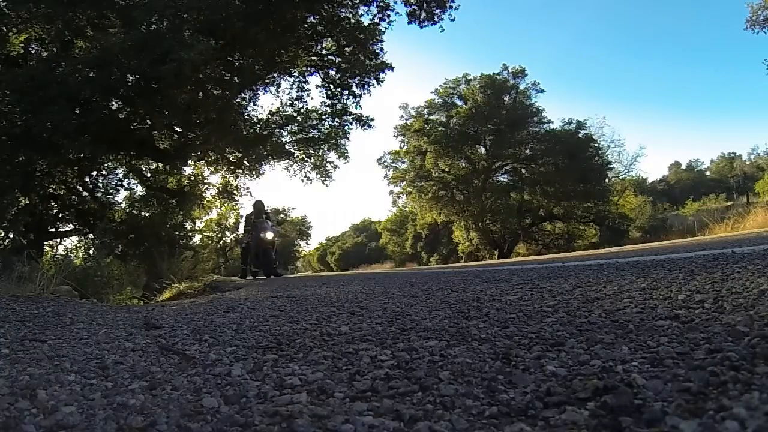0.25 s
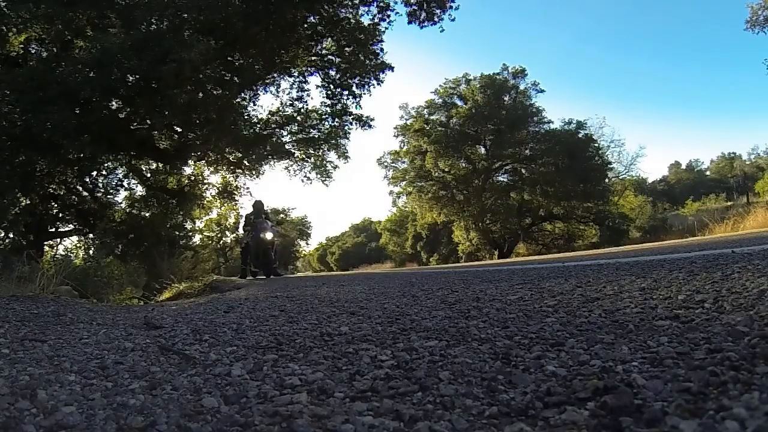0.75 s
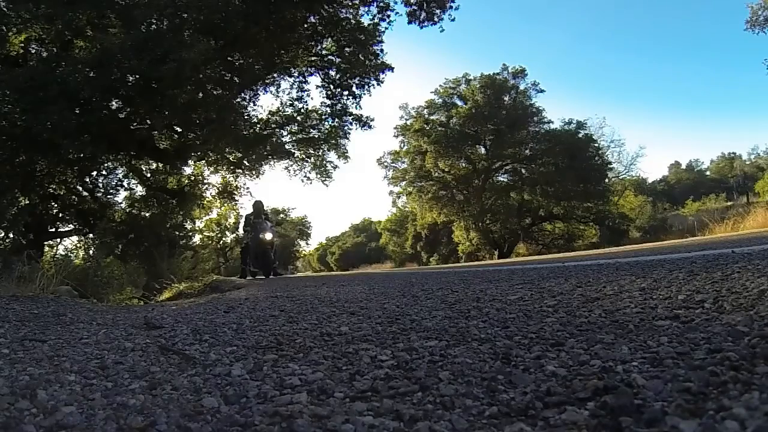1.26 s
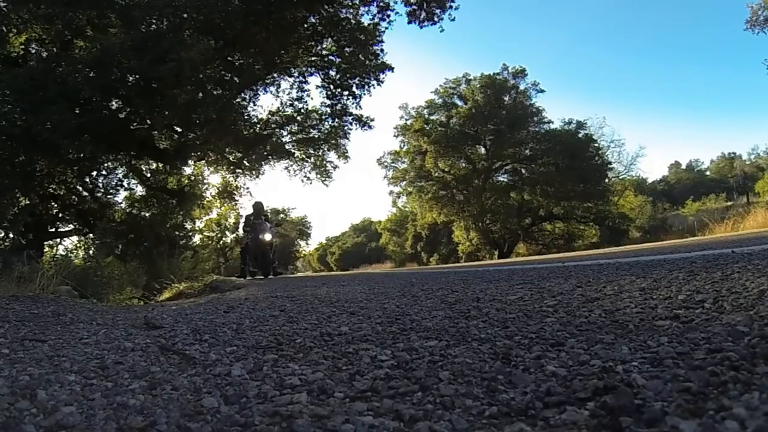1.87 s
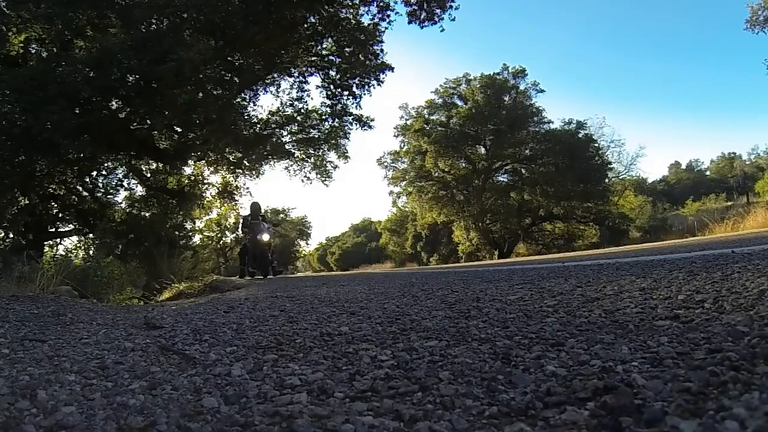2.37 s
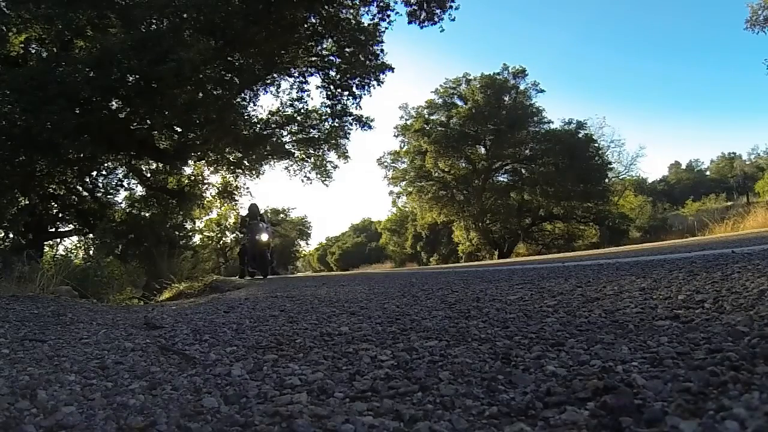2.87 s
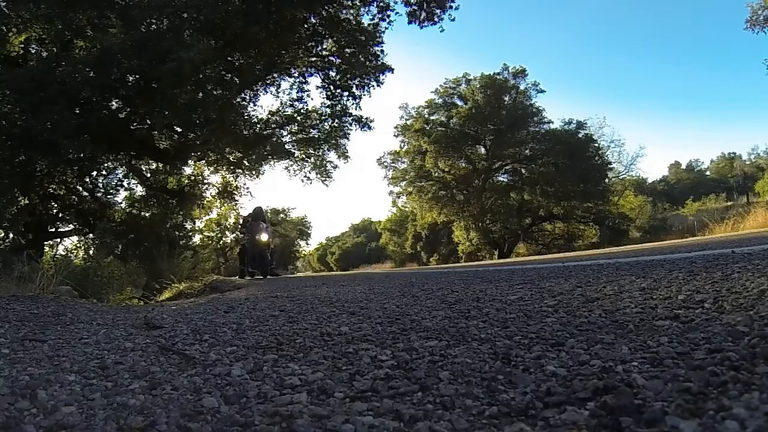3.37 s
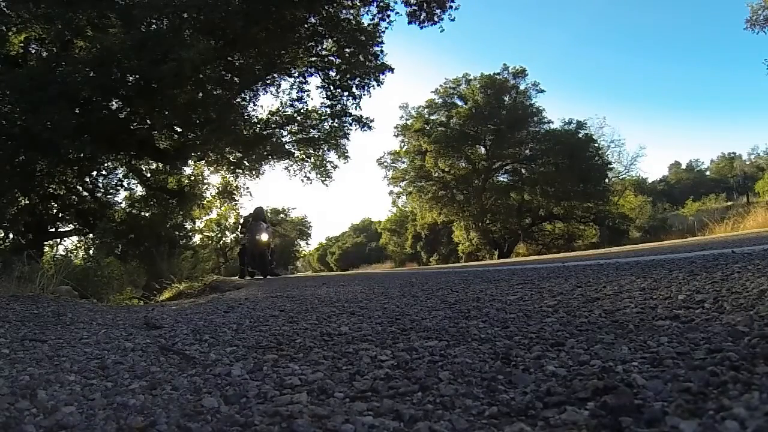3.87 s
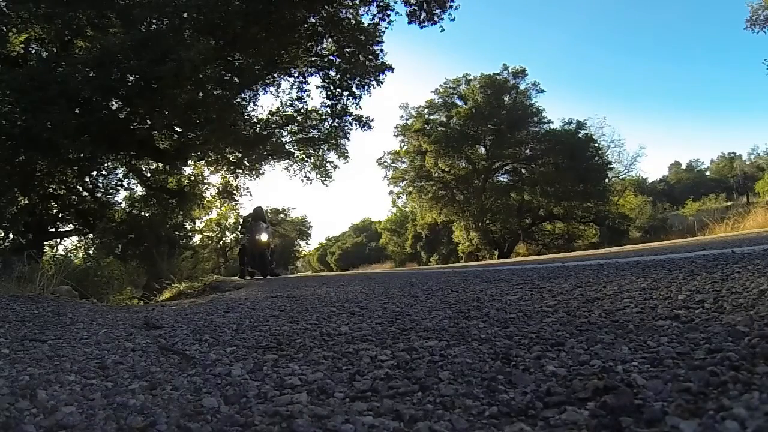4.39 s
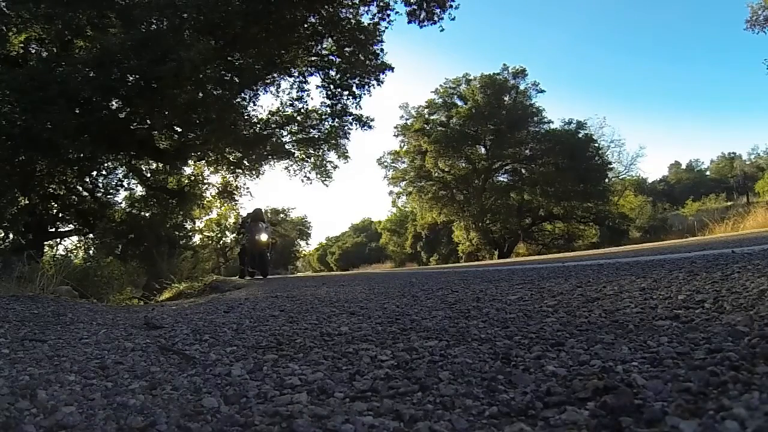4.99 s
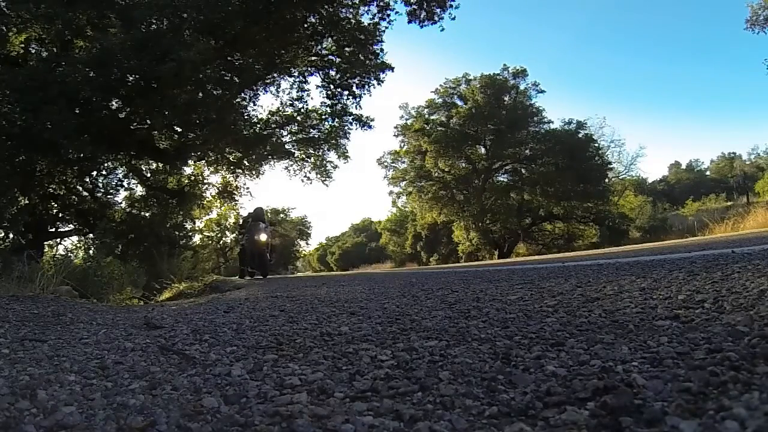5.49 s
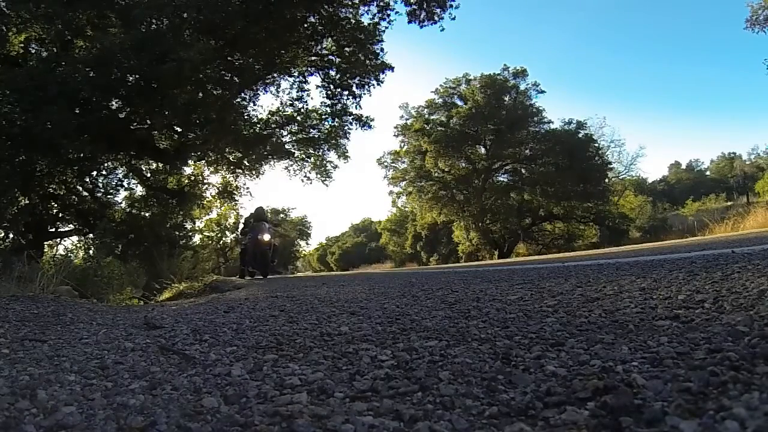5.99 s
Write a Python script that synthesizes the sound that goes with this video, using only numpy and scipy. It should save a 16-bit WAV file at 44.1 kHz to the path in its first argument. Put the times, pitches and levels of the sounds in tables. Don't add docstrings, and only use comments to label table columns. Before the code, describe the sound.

Raspy twin-cylinder motorcycle rev drops, two quick throttle blips, uneven crackling descent to slow chugging, engine cut, then key and stand clicks in quiet outdoor air.

```python
import sys
import numpy as np
from scipy import signal
from scipy.fft import rfft, irfft
from scipy.io import wavfile
from scipy.ndimage import uniform_filter1d

SR = 44100
rng = np.random.default_rng(int(sys.argv[2]) if len(sys.argv) > 2 else 0)


def persist_wave(psi):
    counts = np.round(np.clip(psi, -1, 1) * 32767).astype(np.int16)
    wavfile.write(sys.argv[1], SR, np.atleast_2d(counts).T)


def linear_from_db(decibels):
    return 10 ** (np.asarray(decibels, float) / 20)


N = 275624
T = np.arange(N) / SR
HZ = np.fft.rfftfreq(2 * N, 1 / SR)[1:]

# time_s, cycles_per_s
SPEED = [(0.0, 51.7), (0.14, 59.35), (0.29, 68.48), (0.43, 68.83), (0.8, 57.0), (1.1, 47.71), (1.24, 44.64),
         (1.49, 42.0), (1.78, 43.93), (2.2, 35.34), (2.6, 29.61), (2.9, 25.3), (3.2, 21.92), (3.5, 19.27),
         (3.9, 17.3), (4.3, 16.91), (4.6, 16.01)]
# open_s, shut_s, stroke_peak_on_opening_db, stroke_peak_on_shutting_db
THROTTLE = [
    (-.1, 0.332, -7, -2.5),
    (1.345, 1.448, -19.5, -11.5),
    (1.616, 1.71, -9, -6.5),
]
OPEN_S, SHUT_S = 0.012, 0.06
# time_s, crack_db, treble_db
CATCHES = [(1.84, -24, -13.5), (1.937, -17.5, -4.5), (2.115, -17, -27), (2.288, -26.5, 0.5),
           (2.312, -12.5, -13), (2.378, -17, -13), (2.433, -11, -40), (2.473, -21, -24),
           (2.532, -11.5, -32), (2.572, -34, -12), (2.632, -10, -22), (2.705, -11.5, -19.5),
           (2.747, -28, -8), (2.777, -10, -24), (2.822, -25, -12), (2.851, -18, -22), (2.901, -24, -17),
           (2.973, -22, -12), (3.025, -17, -17), (3.057, -22.5, -21.5), (3.099, -12, -24),
           (3.191, -29, -20), (3.282, -21.5, -19), (3.34, -24, -18.5), (3.376, -19, -24)]
# mode_hz,
# width_hz, level_db
CAN_LOW = [(303, 28.7, 1.5), (461, 56, 3), (657, 75, -9.5), (749, 44, -15.5)]
STOP_S = 5.07


def engine():
    # rise_ms, smoothness, tailpipe_hz, tailpipe_q, pipe_echo_ms, pipe_echo_gain, echo_top_hz,
    # can_echo_ms, can_echo_gain
    kinds = [
        (0.26, 4.63, 50, 12, 13, 0.5, 700, 2.5, 0.2),
        (1.88, 3.19, 233, 1.17, 11.72, 0.32, 790, 2.98, 0.15),
        (1.38, 4.66, 179, 1.1, 13.31, 0.4, 267, 7.44, 0.11),
        (2.86, 4.53, 204, 0.71, 11.13, 0.61, 167, 1.81, -1.21),
        (5.5, 3.68, 145, 1.2, 10.76, 0.95, 120, 6.5, 0.16),
    ]
    s, period, sizes, lumpy, chance, lean = strokes()
    voices = [exhaust(*kind) for kind in kinds]
    pipe = sum(through(train(s, size), voice) for size, voice in zip(sizes, voices))
    pipe += can_ring(s, period, sizes, lumpy, chance) + heave(s, lumpy, chance)
    unfired = late_burns(s, period, lumpy, chance, lean) + run_down()
    pipe += through(unfired, voices[4] + 0.077 * silencer(CAN_LOW))
    return pipe + gas_rasp(s, sizes[0]) + valve_gear(s, period)


def strokes():
    # time_s, share_of_cycle
    twin_gap = [(0, .252), (.27, .216), (.33, .21), (1, .231), (1.4, .245), (1.75, .245), (3.4, .236)]
    second_db = [0.35, 0.21, 0.3, 1.3]
    start = crank()
    cycle = np.diff(start)
    gap = np.interp(start[:-1], *np.transpose(twin_gap)) * cycle
    s = np.r_[start[:-1], start[:-1] + gap]
    period = np.tile(cycle, 2)
    levels, lumpy = mixture(s, 1 / period)
    chance = rng.standard_normal((len(s), 5)).T
    catch_s = np.transpose(CATCHES)[0]
    to_catch_s = np.abs(start[:-1, None] - catch_s).min(axis=1)
    caught = np.tile(to_catch_s, 2) < 0.22 * period
    lean = (s > catch_s[0]) & (s < 3.46)
    s = s + 0.07 * lumpy ** 2 * period * chance[4] * ~caught
    sizes = []
    for level, luck, db in zip(levels, chance, second_db):
        size = level * linear_from_db(3.63 * lumpy * luck * (1.5 - 0.5 * caught))
        sizes.append(size * linear_from_db(np.repeat([0, db], len(gap))))
    sizes[3] = sizes[3] * linear_from_db(lean * np.where(caught, 2.5, -4.0))
    return s, period, sizes, lumpy, chance, lean


def crank():
    turn_at_start, cycles = 0.57, 168
    t = np.arange(-SR, N) / SR
    turns = np.cumsum(np.interp(t, *np.transpose(SPEED))) / SR
    return np.interp(np.arange(cycles), turns - turns[SR - 1] + turn_at_start, t)


def mixture(s, hz):
    # from_s, to_s, peak_db
    afterburn = [
        (1.203, 1.24, -11),
        (1.476, 1.621, -10),
    ]
    # time_s, loss_db
    misfires = [
        (3.15, -6.5),
        (3.24, -4),
        (3.33, -8.5),
        (3.43, -11),
    ]
    hot_db, cool_db, idle_db, blip_hot_db = -11, -7.5, -4.5, -11.5
    lean_cool_db, lean_hot_db, lean_burn_db = -4, -21.5, -37.5
    steady, open_lumpy, lean_lumpy = 0.07, 0.13, 0.65
    gates = [gate(s, a, b, OPEN_S, SHUT_S) ** 2 for a, b, *_ in THROTTLE]
    wide = 0
    for g, (a, b, db, end_db) in zip(gates, THROTTLE):
        wide = wide + g * linear_from_db(np.interp(s, [a, b], [db, end_db]))
    burns = [gate(s, a, b, 0.0065, 0.015) for a, b, _ in afterburn]
    shut = 1 - sum(gates)
    lean = gate(s, 1.5, 3.1, 0.33, 0.36)
    gulp = sum(gate(s, a - 0.015, a, 0.031, OPEN_S) for a, *_ in THROTTLE)
    miss_db = sum(db * (np.abs(s - 0.1 / hz - at) < 0.3 / hz) for at, db in misfires)
    hot = above(hz, 55.86, 0.49)
    idle = 1 - above(hz, 27.96, 5.1)
    hot_shut = linear_from_db(hot_db + 1.8 * (1 - hot)) * np.sqrt(hot) + linear_from_db(lean_hot_db) * lean + linear_from_db(-21.5) * burns[1]
    hot_peak = shut * hot_shut + (1 - shut) * (1 - hot) * linear_from_db(blip_hot_db)
    cool_share = (1 - sum(burns)) * (1 - 0.6 * gulp) * np.sqrt(1 - hot) * (1 - idle)
    cool_peak = shut * cool_share * linear_from_db(cool_db + lean_cool_db * lean)
    burn_peak = idle * linear_from_db(idle_db + miss_db) + shut * lean * linear_from_db(lean_burn_db)
    burn_peak = burn_peak + sum(g * linear_from_db(row[2]) for g, row in zip(burns, afterburn))
    lumpy = shut * (steady + (lean_lumpy - steady) * lean) + (1 - shut) * open_lumpy
    return [wide, hot_peak, cool_peak, burn_peak], lumpy


def exhaust(rise, smooth, tail_hz, q, pipe, back, top_hz, can, bounce):
    s, w = 2j * np.pi * HZ, 2 * np.pi * tail_hz
    flow = -s / (1 + s * rise / 1000) ** smooth
    mouth = s * s / (s * s + s * w / q + w * w)
    can_echo = 1 + bounce * np.exp(-s * can / 1000)
    pipe_return = back * np.exp(-s * pipe / 1000) / (1 + 1j * HZ / top_hz) ** 2
    stroke = flow * mouth * can_echo / (1 - pipe_return)
    return stroke / np.abs(irfft(np.r_[0, stroke])).max()


def can_ring(s, period, sizes, lumpy, chance):
    # mode_hz, width_hz, level_db
    can_high = [(670, 140, 0.5), (1270, 1180, 3.5), (1980, 1200, 2.5), (2980, 600, -8.5)]
    # mode_hz, width_hz, level_db
    can_hot = [(432, 43, 2.5), (560, 120, -7.5), (703, 22, -1.5)]
    # mode_hz, width_hz, level_db
    can_open = [(336, 12, -1), (496, 26, -13), (810, 36, 4)]
    wide, hot, cool, burn = sizes
    catch_s, crack_db, treble_db = np.transpose(CATCHES)
    fronts = train(s + 0.000944, 0.051 * hot + 0.1 * cool) + train(s + 0.00075, 0.19 * burn)
    out = through(fronts + train(catch_s, linear_from_db(crack_db - 2.0)), silencer(CAN_LOW))
    hot_fronts = (0.11 * hot + 0.055 * cool) * (wide < 0.01) * (lumpy < 0.2)
    out += through(train(s + 0.001, hot_fronts), silencer(can_hot))
    out += through(train(s + 0.0006, 0.12 * wide * (period > 0.019)), silencer(can_open))
    shocks = 0.37 * wide * linear_from_db(1.5 * chance[4]) * (lumpy < 0.4)
    out += through(train(s + 0.00058, shocks), silencer(can_high))
    cracks = train(catch_s, linear_from_db(crack_db + treble_db + 5.5))
    return out + through(cracks, silencer([(1090, 240, 5), (2270, 420, -10.0)]))


def silencer(modes):
    bell = sum(-(-1) ** k * linear_from_db(db) * ring(hz, width) for k, (hz, width, db) in enumerate(modes))
    bell = bell / (1 + 1j * HZ / 3000) ** 3
    return bell / np.abs(irfft(np.r_[0, bell])).max()


def heave(s, lumpy, chance):
    push = 0.15 * lumpy ** 2 * chance[0] + 0.04 * gate(s, 0.34, 0.39, 0.02, 0.011)
    return through(train(s, push), silencer([(54, 8.9, 0), (75.6, 18, 0)]))


def late_burns(s, period, lumpy, chance, lean):
    size = lean * lumpy * (1 - above(1 / period, 33, 5.9)) * linear_from_db(-11.5 + 7.9 * chance[1])
    return train(s + period * (0.45 + 0.08 * chance[0]), size)


def run_down():
    # time_s, peak_db, gap_to_second_cylinder_s, second_peak_db
    stall = [
        (4.631, -13, .018, -11),
        (4.705, -10.5, 0.02, -8.5),
        (4.79, -13.5, 0.022, -11),
        (4.898, -15, .034, -16),
        (5.08, -22.5, 0.047, -38),
    ]
    cut_s, cut_db, gap, next_db = np.transpose(stall)
    return train(np.r_[cut_s, cut_s + gap], linear_from_db(np.r_[cut_db, next_db]))


def gas_rasp(s, wide):
    # tone_hz, density_db
    rasp_tone = [(700, -28.5), (1200, -5.5), (1800, 0.5), (2600, -7.5), (3900, -19.5), (6000, -23),
                 (15000, -40.5)]
    puff = fade(train(s, wide), ms=11.0)
    return linear_from_db(-33.5 - 14.5) * puff * noise(rasp_tone)


def valve_gear(s, period):
    # tone_hz, density_db
    gear_tone = [(290, 0), (500, -1), (655, -4.5), (788, -3.5), (896, -14.5), (1160, -12.5), (1300, -7),
                 (1540, -15), (2460, -14.5), (3990, -26), (5090, -30), (6860, -40), (15000, -48.5)]
    # mode_hz, width_hz, level_db (the level is unused)
    case = [(1274, 22, 0), (1960, 31, -7), (2640, 54, -7), (5000, 120, -18), (6060, 710, -26),
            (7480, 40, -31)]
    knock_size = linear_from_db(1.7 * rng.standard_normal(2 * len(s)))
    knocks = fade(train(np.r_[s, s + 0.5 * period], knock_size), ms=4.5)
    gear = noise(gear_tone) * (1 + 0.5 * knocks)
    case_ring = sum(ring(hz, 0.5 * width) for hz, width, _ in case)
    gear = unit(gear + 0.36 * through(gear, case_ring))
    return linear_from_db(rattle() + 8.5 + 0.5 * walk(4.8)) * gear


def rattle():
    idle_db, db_per_octave, load_db = -43, 1, 8.5
    cut_s, rundown_db_per_s = 4.684, -34.5
    hz = np.interp(T, *np.transpose(SPEED))
    load = sum(gate(T, a, b, OPEN_S, SHUT_S) for a, b, *_ in THROTTLE) * above(hz, 61.5, 3.5)
    db = idle_db + db_per_octave * np.log2(hz / hz.min()) + load_db * load
    db = db + rundown_db_per_s * np.maximum(T - cut_s, 0)
    return db - 40 * (1 - gate(T, 0, STOP_S, 1, 0.03))


def rider():
    # time_s, peak_db, ring_hz, thud_db, t60_s
    small_clicks = [
        (2.302, -43.5, 5530, -60, 0.034),
        (2.476, -48, 6000, -52, 0.039),
        (4.565, -50.5, 12320, -53, 0.014),
        (5.362, -34.5, 523, -71, 0.071),
        (2.326, -32, 1290, -51, 0.014),
        (6.232, -53, 900, 12, .02),
                    (5.1037, -32, 1460, -37, 0.052), (5.1058, -34, 2300, -40, 0.063),
              (5.035, -52, 1500, -20, .04), (5.3318, -51, 1720, 9.5, 0.06), (5.358, -46, 3200, -25, 0.071),
              (5.3918, -36, 3280, -24, 0.065), (5.411, -38, 3770, -25, 0.019),
              (5.4244, -41.5, 3770, -18, 0.092), (5.453, -37, 3320, -21, 0.084),
              (5.4913, -45, 3670, -17, 0.042), (5.5515, -26.5, 1440, 5, 0.058),
              (5.8515, -29.5, 2980, 2.5, 0.032), (5.8505, -32, 1250, -22, 0.088),
              (6.0474, -45, 1180, 2, 0.095), (6.1474, -38, 2840, -10, 0.049),
              (6.1636, -41, 1030, 2.5, 0.099), (6.1953, -43.5, 4060, -10, 0.064)]
    out = np.zeros(N)
    for s, db, hz, thud_db, t60 in small_clicks:
        i = int(s * SR)
        click = metal_click(hz, thud_db, t60)
        out[i:i + len(click)] += (linear_from_db(db) * click)[:N - i]
    return out + keys() + scuffs()


def metal_click(hz, thud_db, t60):
    t = np.arange(int(0.15 * SR)) / SR
    fall = np.exp(-np.log(1000) * t / t60)
    edges = [0.5 * hz, min(max(1.35 * hz, 3800), 15000)]
    band = signal.butter(3, edges, "band", fs=SR, output="sos")
    tick = signal.sosfilt(band, rng.standard_normal(len(t)))
    ring_hz = hz * np.array([[1], [0.62], [1.27], [1.9]]) * (1 + 0.015 * rng.standard_normal((4, 1)))
    rings = np.array([0.68, 0.076, 0.068, 0.025]) @ np.sin(2 * np.pi * ring_hz * t)
    thud = linear_from_db(thud_db + 12.0) * np.sin(2 * np.pi * 240 * t) * np.exp(-np.log(1000) * t / 0.012)
    return 1.3 * tick * fall + rings * fall ** 1.37 + thud


def keys():
    brush = unit(through(rng.standard_normal(N), ring(3000, 840) ** 2))
    return linear_from_db(-54 + 3.5 * walk(70)) * brush * gate(T, 5.37, 5.47, 0.013, 0.04)


def scuffs():
    # from_s, to_s, level_db
    moves = [
        (5.139, 5.26, -51.5),
        (5.38, 5.48, -67),
        (6.203, 6.3, -64.5),
    ]
    # tone_hz, density_db
    scuff_tone = [(180, -50), (300, -14), (647, -9), (812, -6.5), (1400, -5), (1520, -5), (2300, -7.5),
                  (9000, -49), (11700, -80), (19800, -120)]
    edge_s = 0.019
    stir = linear_from_db(-58) * gate(T, STOP_S, T[-1], edge_s, 1)
    stir += sum(linear_from_db(db) * gate(T, a, b, edge_s, edge_s) for a, b, db in moves)
    return stir * linear_from_db(2.0 * walk(51)) * noise(scuff_tone)


def air():
    # tone_hz, density_db
    air_tone = [(12, -17), (20, 0.5), (109, -17.5), (439, -22), (564, -23), (648, -25.5), (1670, -47.5),
                (2270, -36), (2530, -30.5), (4540, -44), (4940, -39.5), (5370, -47.5), (7290, -52),
                (15400, -62.5)]
    hiss = linear_from_db(-42 - 4.5 + 0.6 * walk(5.5)) * noise(air_tone)
    rumble = unit(through(rng.standard_normal(N), ring(28, 40) ** 2))
    insects = unit(through(rng.standard_normal(N), ring(7450, 350) ** 2))
    return hiss + linear_from_db(-64 + 3.7 * walk(4.5)) * rumble + linear_from_db(-78.5) * insects


def unit(x):
    return x / np.sqrt(np.mean(x ** 2))


def through(x, response):
    return irfft(np.r_[0, response] * rfft(x, 2 * N))[:N]


def noise(tone):
    hz, db = np.transpose(tone)
    return unit(through(rng.standard_normal(N), linear_from_db(np.interp(np.log(HZ), np.log(hz), db))))


def ring(hz, width):
    return 1 / (1 + 1j * (HZ ** 2 - hz ** 2) / (HZ * width))


def train(s, size):
    keep = (s >= 0) & (s * SR < N - 1)
    at, size = s[keep] * SR, size[keep]
    part = at % 1
    return np.bincount(np.r_[at, at + 1].astype(int), np.r_[size * (1 - part), size * part], N)


def fade(x, ms):
    return signal.lfilter([1], [1, -np.exp(-1000 / (ms * SR))], x)


def walk(rate):
    k = int(SR / rate)
    held = np.repeat(rng.standard_normal(N // k + 1), k)
    return 1.3 * uniform_filter1d(uniform_filter1d(held, k), k)[:N]


def gate(t, start, end, attack, release):
    return np.clip(1 + (t - start) / attack, 0, 1) * np.clip(1 - (t - end) / release, 0, 1)


def above(hz, edge_hz, spread):
    return 1 / (1 + np.exp((edge_hz - hz) / spread))


def scene():
    bike = engine()
    t = np.arange(int(0.5 * SR)) / SR
    trees = rng.standard_normal(len(t)) * np.exp(-np.log(1000) * t / 0.3) * (t > 0.02)
    wet = signal.fftconvolve(bike, trees / np.sqrt(np.sum(trees ** 2)))[:N]
    return (bike + linear_from_db(-21) * wet + rider() + air())[None]


def band_limit(x):
    return signal.sosfilt(signal.butter(12, 15600, fs=SR, output="sos"), x)


def record(dry):
    rounded = 0.92 * np.tanh(dry / 0.94)
    low_pass = signal.ellip(8, 0.3, 60, 15450, fs=SR, output="sos")
    return band_limit(signal.sosfilt(low_pass, rounded))


dry = scene()
out = record(dry)
persist_wave(out)
```